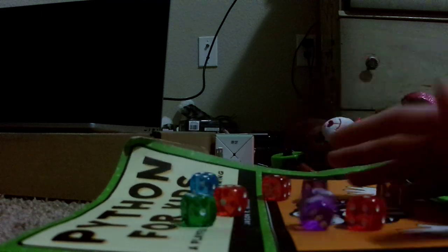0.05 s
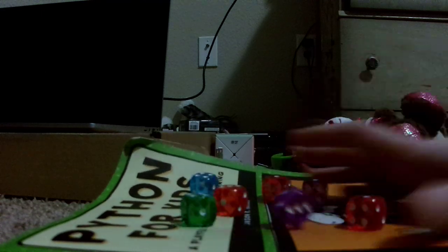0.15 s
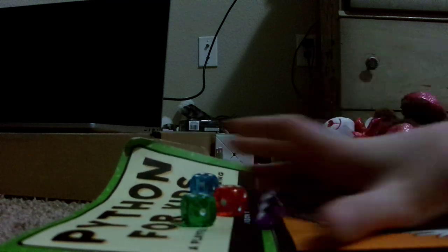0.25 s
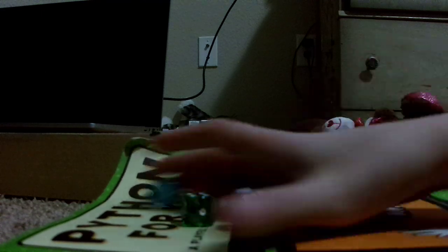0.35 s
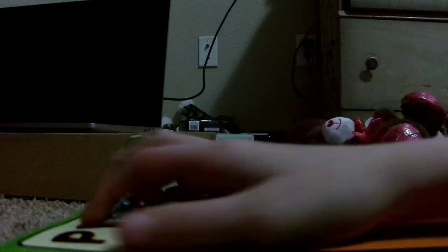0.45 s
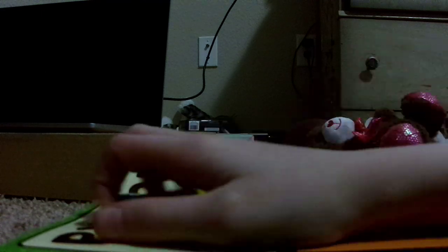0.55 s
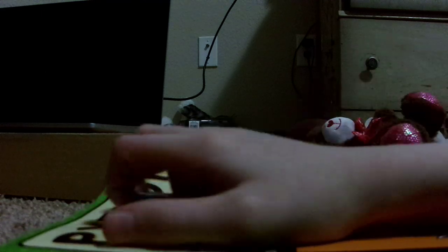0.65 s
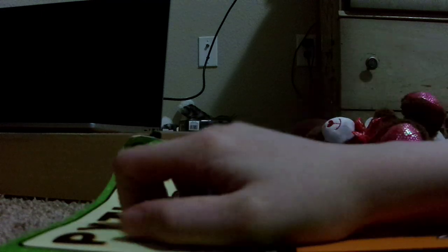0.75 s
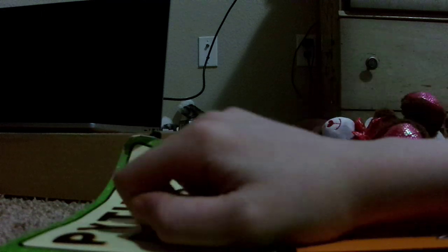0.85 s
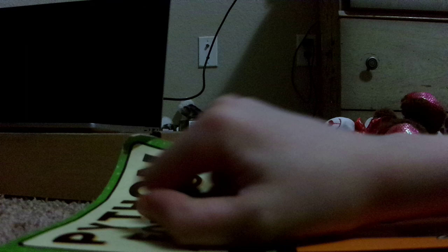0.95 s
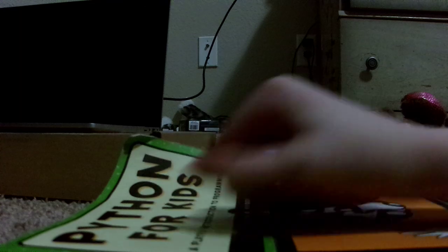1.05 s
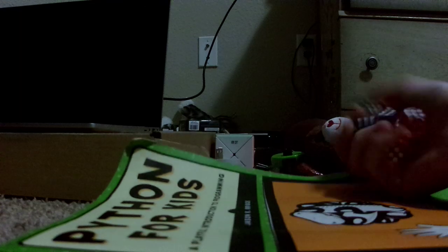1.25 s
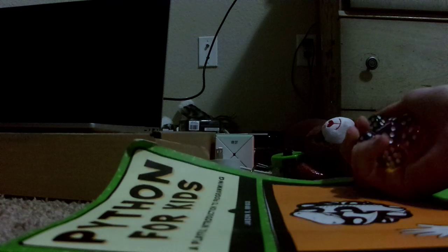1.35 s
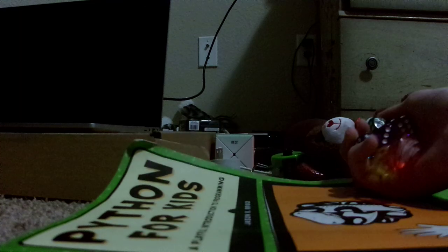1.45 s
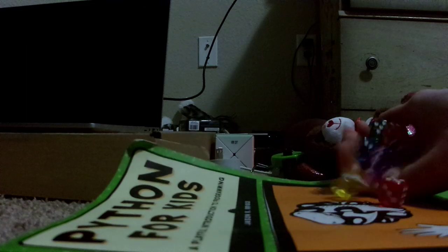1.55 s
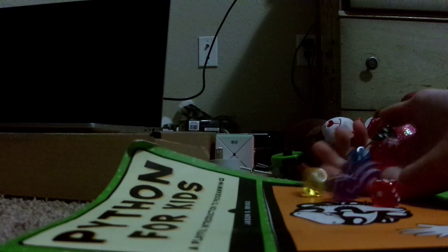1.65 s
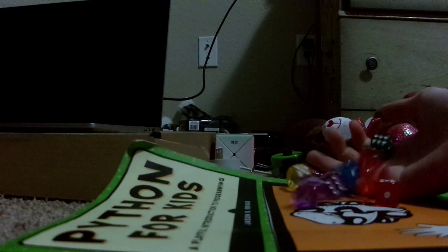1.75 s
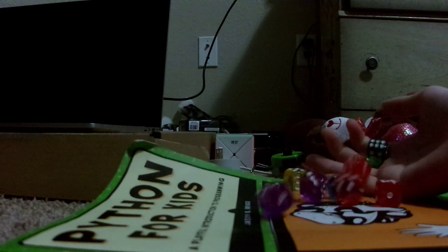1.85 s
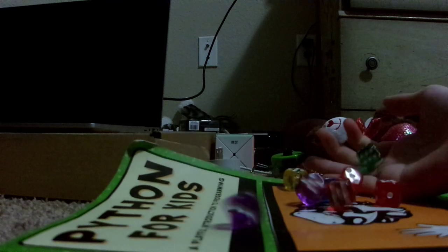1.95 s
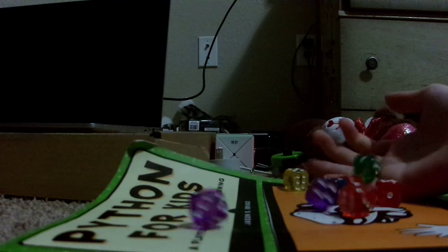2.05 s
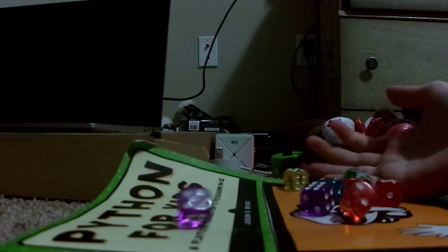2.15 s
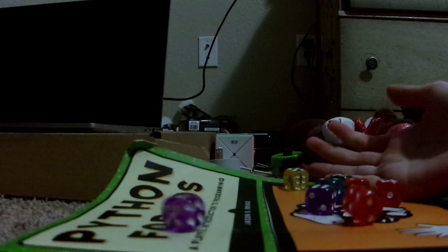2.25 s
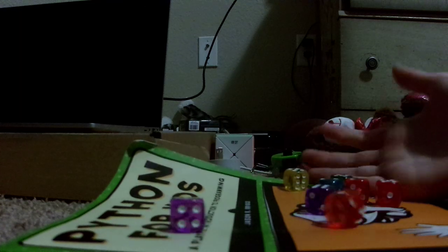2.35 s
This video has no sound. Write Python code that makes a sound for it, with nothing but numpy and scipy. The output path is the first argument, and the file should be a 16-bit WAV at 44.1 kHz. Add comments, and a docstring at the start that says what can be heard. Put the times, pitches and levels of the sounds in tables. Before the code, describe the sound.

Plastic dice clack dry and bright as a hand scoops them off a paperback from 0.2 s, densest and loudest around 0.6-0.7 s, with soft skin brushing and dull book knocks. Nearly quiet from 0.9 s; small muffled, pitched rattles in the hand at 1.24-1.33 s. At 1.5 s they spill onto the cover, thudding, slapping and ticking, a sharp clack at 2.09 s, then fading taps. Small room, faint low hum, close microphone.

```python
"""In a small quiet room with a low hum, plastic dice are scooped off a paperback book and rolled back onto it.
Die against die gives a dry, bright clack: a sharp hit with a short chatter rings three broad resonances.
Die against book gives a tick, a slap of the cover and a hollow thud made of fading tones.
Shaped noise makes the hand's brushing and the grinding dice; the hollow of the hand adds pitched knocks.
The room answers with a fading tail of noise."""
import sys
import numpy as np
from scipy import signal
from scipy.fft import rfft, irfft, next_fast_len
from scipy.io import wavfile
from scipy.ndimage import map_coordinates

SR = 44100
rng = np.random.default_rng(int(sys.argv[2]) if len(sys.argv) > 2 else 0)


def dump(signal):
    """Clip the signal to [-1, 1] and save it as 16-bit WAV at the path in sys.argv[1]."""
    limited = np.clip(np.atleast_2d(signal).T, -1, 1)
    pcm = np.round(limited * 32767).astype(np.int16)
    wavfile.write(sys.argv[1], SR, pcm)


N = 103635

# Time and frequency grids for one short sound
T = np.arange(8192) / SR  # s
HZ = np.fft.rfftfreq(len(T), 1 / SR)

# Room air: [f/Hz, relative level/dB]
AIR_COLOUR = [(28, 2.5), (42, 1), (170, 4), (300, -0.5), (560, -12), (3000, -21), (16000, -27.5)]
AIR_DB = -60.5
# Steady low tones of the room: [f/Hz, middle level/dB]
HUM_TONES = [(27, -55.5), (81.5, -66), (120, -65), (163.5, -61)]
HUM_WAVER_DB = 1.5  # typical size of the random level knots
# Time the room's tail takes to fall by 60 dB: [f/Hz, t/s]
ROOM_T60 = [(300, 0.43), (2000, 0.31), (9000, 0.15), (16000, 0.062)]
ROOM_DELAY_S = 0.004
# Room level for dice in the open hand, dice in a fully closed hand, and the book
OPEN_WET_DB, CUPPED_WET_DB, BOOK_WET_DB = -16.5, -13.5, -15

# How far the hand encloses the dice: [t/s, closed 0-1]
HAND_CLOSED = [(.37, 0.25), (.54, 0.47), (.72, 0.73), (.85, 0.93), (1.3, 0.24), (1.5, 0.01)]
# Skin and sleeve brushing over the cover: [middle t/s, length t/s, level/dB, extra treble/dB]
STROKES = [(0.212, 0.2, -64.5, 11.5), (0.332, 0.31, -58, -1.5), (.55, .38, -55, -2.5),
           (0.956, 0.08, -63.5, 0), (1.058, 0.14, -63, -1), (1.17, 0.034, -58.5, -2)]
# Sound of the brushing: [f/Hz, relative level/dB]
BRUSH_COLOUR = [(150, 7), (350, 19.5), (620, -0.5), (1900, 6), (5000, -1.5), (10500, -1), (16000, -18)]
STROKE_TREBLE_HZ = (3000, 12000)  # extra treble starts, is complete

# Die against book: [t/s, thud level/dB, cover slap level/dB, tick level/dB]
# THUD_DB, SLAP_DB and TICK_DB are added to these levels
KNOCKS = [(0.404, -30, -16, -44), (0.4168, -12.5, -16, -46), (0.4523, -16, -17, -25),
          (0.6093, -12.5, -12, -31), (0.6172, -8, -29, -31), (0.6272, -18.5, -26, -32),
          (0.6993, -16.5, -29, -26), (1.5145, -2, -14, -14.5), (1.523, -9.5, -17.5, -19.5),
          (1.551, -17.5, -32, -30), (1.5648, -18, -22.5, -26.5), (1.603, -16.5, -30, -48),
          (1.6246, -8.5, -15, -38), (1.6649, -22, -27.5, -28.5), (1.6908, -5, -15, -19.5),
          (1.7534, -12, -28, -22), (1.7828, -9, -14, -33), (1.7946, -13, -19, -32),
          (1.799, -16, -19.5, -35), (1.83, -13.5, -19, -28), (1.8656, -16, -28, -38),
          (1.9007, -6.5, -13.5, -27), (1.9533, -12, -16, -25), (1.9618, -14, -22, -31.5),
          (1.9936, -20, -27.5, -37.5), (2.0376, -22, -30.5, -37), (2.058, -22, -27, -36),
          (2.0922, -18.5, -24.5, -26), (2.1622, -16.5, -23, -34), (2.1897, -30, -26.5, -61),
          (2.2009, -20.5, -26, -44), (2.2578, -30, -27.5, -38.5), (2.2698, -22, -27, -48),
          (2.3253, -21, -28.5, -39), (2.3433, -26, -29, -39)]
# Tones of the book: [f/Hz, relative level/dB, time to fall by 60 dB t/s]
BOOK_TONES = [(260.3, -1.5, 0.11), (328.2, 15.5, 0.038), (352.2, -7, 0.26), (394.3, -11, 0.23),
              (739, -2.5, 0.037)]
BOOK_RISE_S, BOOK_BAND_HZ, THUD_DB = 0.0013, (166, 800), 1.5
# Sound of the cover slap: [f/Hz, relative level/dB]
SLAP_COLOUR = [(150, -34), (550, -3.5), (780, 1.5), (980, -3), (1220, 0), (1550, 2), (1880, -3.5),
               (2300, -0.5), (3600, -11), (16000, -28.5)]
SLAP_T60_S, SLAP_DB = 0.015, 0.5  # ring before the hand draws it out; added level
TICK_T60_S, TICK_DB = 0.0034, (-4, -10, 0.5)  # ring; added level in each resonance of the dice

# The hollow of the closed hand rings as the dice shift in it: [t/s, level/dB, pitch f/Hz]
HOLLOWS = [(0.978, -31, 2070), (1.2398, -21.5, 2650), (1.271, -26, 2730), (1.2931, -22.5, 2780),
           (1.3217, -21, 3050)]
HOLLOW_HALF_WIDTH, HOLLOW_T60_S = 0.14, 0.018  # share of the pitch; ring
# Dice grinding past each other in the hand: [t/s, length t/s, level/dB]
GRINDS = [(0.4496, 0.014, -37), (0.5442, 0.0039, -30), (0.621, 0.0071, -41), (0.704, 0.0063, -32.5),
          (1.325, 0.019, -53)]

# Die against die, in each resonance of the dice: [t/s, low level/dB, middle level/dB, high level/dB]
# CLACK_DB is added to these levels
CLACKS = [(0.013, -35, -31, -39), (0.2255, -18, -5, -20), (0.2478, -20, -20, -23),
          (0.2597, -15.5, -14, -21), (0.3591, -13, -0.5, -9), (0.3893, -12, -9, -2.5),
          (0.397, -13.5, -11, -15), (0.4038, -29, -11, -14), (0.432, -25, -26, -16),
          (0.4341, -15, -17, -20), (0.447, -27, -22, -19), (0.481, -24, -17.5, -14),
          (0.5039, -12.5, -22, -12.5), (0.5166, -23, -16, -13), (0.5281, -26, -24, -16),
          (0.5381, -32, -13.5, -11), (0.5416, -6, -14, -5), (0.5978, -10, -23, -21.5),
          (0.605, -20, -15, -25), (0.6091, -1.5, 0, 2.5), (0.6158, -4.5, -6.5, -4),
          (0.628, -6.5, -11, -5.5), (0.6315, -10, -10, -18), (0.6873, -24, -16, -40),
          (0.6924, -18.5, -11.5, -8), (0.6961, -17, -13, -11), (0.6995, -20, -10, -3.5),
          (0.7023, -12, -4.5, 0), (0.721, -29, -17, -56), (0.768, -27, -17, -20.5), (0.7716, -32, -19, -40),
          (0.7904, -25, -10, -22.5), (0.8006, -26, -17, -30), (0.8308, -27.5, -22.5, -29),
          (0.8894, -34, -38, -43), (0.9634, -30.5, -33, -43), (1.24, -31, -22.5, -35),
          (1.2692, -30, -13.5, -21), (1.274, -24, -16, -33), (1.2892, -20, -14.5, -13),
          (1.303, -20.5, -35, -7.5), (1.3086, -24.5, -12, -18), (1.3119, -21.5, -14.5, -21),
          (1.3202, -23, -20, -35), (1.3301, -23.5, -18.5, -34.5), (1.5197, -9.5, -13.5, -7),
          (1.5829, -21, -16.5, -22), (1.5929, -14.5, -18.5, -23), (1.602, -18, -20, -25.5),
          (1.706, -31, -14, -23), (1.7112, -29, -20, -44), (1.72, -34, -19, -41), (1.7339, -25, -14, -12),
          (1.756, -20, -15, -25), (1.7607, -18, -13, -32), (1.8078, -19.5, -30, -28),
          (1.8198, -17.5, -11.5, -16.5), (2.092, -7, -5, -13.5), (2.0942, -41, -16, -12.5),
          (2.1301, -24, -19, -28), (2.1383, -18, -20, -30), (2.143, -17.5, -21, -37),
          (2.1483, -26, -22, -39)]
CLACK_DB = -5
# Centres of the three broad resonances of the dice: [low f/Hz, middle f/Hz, high f/Hz]
DICE_HZ = (3500, 6740, 9400)
# Sound shared by all die hits: [f/Hz, relative level/dB]
DICE_COLOUR = [(150, -12.5), (1000, -9.5), (2600, -1), (4000, 2.5), (5400, -1), (7000, 0), (8300, 0.5),
               (9600, 2), (10600, -1), (11700, -15), (16000, -32.5)]
OPEN_T60_S, CUPPED_T60_S = 0.0043, 0.011  # chatter of a clack in the open and fully closed hand
CHATTER = 0.25  # size against the hit, before the hand changes it
HARDNESS = 0.75  # open hand: dB of top treble per dB by which the high resonance leads the middle
TOP_TREBLE = np.clip((HZ - 10000) / 4000, 0, 1)

TOP_HZ = 16300  # upper limit of the whole sound


def amp(db):
    """Turn decibels into gain."""
    return 10 ** (np.asarray(db) / 20)


def unit(x):
    """Scale a sound to energy 1."""
    return x / np.sqrt(np.sum(x ** 2) + 1e-20)


def along(points, hz):
    """Read (Hz, value) points along a logarithmic axis."""
    f, v = np.transpose(points)
    return np.interp(np.log(hz + 1), np.log(f + 1), v)


def curve(points, s):
    """Read (s, value) points at the times s."""
    return np.interp(s, *np.transpose(points))


def filtered(x, response):
    """Change the strength of each frequency in x by the given response."""
    m = next_fast_len(N + SR // 2)
    spectrum = rfft(x, m) * response(np.fft.rfftfreq(m, 1 / SR))
    return irfft(spectrum, m)[:N]


def noise(colour):
    """Make coloured noise with an average (rms) strength of 1."""
    shaped = filtered(rng.standard_normal(N), lambda hz: amp(along(colour, hz)))
    return unit(shaped) * np.sqrt(N)


def wobble(rate):
    """Draw a smooth random curve with the given number of knots a second."""
    knots = rng.standard_normal(int(N * rate / SR) + 4)
    return map_coordinates(knots, [np.arange(N) * rate / SR])


def add(track, s, sound):
    """Mix a sound into the track at time s."""
    part = track[round(s * SR):][:len(sound)]
    part += sound[:len(part)]


def background():
    """Shaped noise is the room air; low tones that gently waver in level and phase are the hum."""
    t = np.arange(N) / SR
    hum = np.zeros(N)
    for hz, db in HUM_TONES:
        level = amp(db + HUM_WAVER_DB * wobble(1.76)) * np.sqrt(2)
        phase = 2 * np.pi * (hz * t + rng.random()) + 0.5 * wobble(2.0)
        hum += level * np.sin(phase)
    return hum + amp(AIR_DB) * noise(AIR_COLOUR)


def room(x):
    """The room spreads sound into a noise tail in which each frequency dies at its own speed."""
    hz, t, z = signal.stft(rng.standard_normal(SR // 2), SR, nperseg=256)
    fade = amp(-60 * t / along(ROOM_T60, hz)[:, None])
    tail = signal.istft(z * fade, SR, nperseg=256)[1]
    delayed = np.pad(unit(tail), (round(ROOM_DELAY_S * SR), 0))
    return signal.fftconvolve(x, delayed)[:N]


def contact(t60, chatter):
    """A hit pushes once, sharply, then chatters with quickly dying random force."""
    force = chatter * rng.standard_normal(len(T)) * amp(-60 * T / t60)
    force[0] = -1
    return force


def body(force, gain_db):
    """A struck body answers only after the force arrives, with the given gain at each frequency."""
    # Folding the cepstrum to its early half gives a filter with no sound before the hit
    cepstrum = irfft(np.log(amp(gain_db)), len(T))
    cepstrum[1:len(T) // 2] *= 2
    cepstrum[len(T) // 2:] = 0
    return irfft(rfft(force) * np.exp(rfft(cepstrum)), len(T))


def die(force, levels_db):
    """A die rings in three broad resonances; their balance depends on how it is struck."""
    hz = HZ * np.exp(0.03 * rng.standard_normal())  # slightly different pitch each time
    colour = along(DICE_COLOUR, hz) + np.interp(hz, DICE_HZ, levels_db)
    return np.linalg.norm(amp(levels_db)) * unit(body(force, colour))


def brush(grain_db=2, touches_per_s=600, touch_db=5):
    """Each hand stroke over the book is a swell of uneven hiss; the closing hand jostles the dice."""
    t = np.arange(N) / SR
    hiss, level = np.zeros(N), np.zeros(N)
    for s, length, db, treble_db in STROKES:
        swell = amp(db) * np.exp(-np.abs(2 * (t - s) / length) ** 3)
        hiss += swell * filtered(
            noise(BRUSH_COLOUR), lambda hz: amp(np.interp(hz, STROKE_TREBLE_HZ, (0, treble_db))))
        level += swell
    effort = np.clip(level / level.max() * curve(HAND_CLOSED, t), 0, 1)
    # Touches come more often, and harder, with more effort
    happens = rng.random(N) < effort * touches_per_s / SR
    touches = happens * rng.standard_normal(N) * np.sqrt(SR / touches_per_s)
    touch_sound = die(contact(OPEN_T60_S, CHATTER), np.zeros(len(DICE_HZ)))
    jostle = signal.fftconvolve(touches * effort, touch_sound)[:N]
    return hiss * amp(grain_db * wobble(110)) + amp(touch_db) * level * jostle


def knocks(scatter_db=2.2, detune=0.046, slap_chatter=0.12, tick_chatter=0.44):
    """A landing die ticks, the cover slaps and the book thuds in several fading tones."""
    out = np.zeros(N)
    pages = signal.butter(2, BOOK_BAND_HZ, "bandpass", fs=SR, output="sos")
    shortest = min(t60 for hz, db, t60 in BOOK_TONES)
    for s, thud_db, slap_db, tick_db in KNOCKS:
        tones = np.zeros(len(T))
        for hz, db, t60 in BOOK_TONES:
            level = amp(db + scatter_db * rng.normal() - 60 * T / t60)
            # Short tones shift more with the landing spot than long ones
            pitch = hz * (1 + detune * shortest / t60 * rng.normal())
            tones += level * np.sin(2 * np.pi * pitch * T)
        thud = unit(signal.sosfilt(pages, tones * (1 - np.exp(-T / BOOK_RISE_S))))
        # A die under the hand scrapes on instead of bouncing
        drag = 1 + 2 * np.clip(curve(HAND_CLOSED, s), 0, 1)
        slap_force = contact(SLAP_T60_S * drag, slap_chatter * drag)
        slap = unit(body(slap_force, along(SLAP_COLOUR, HZ)))
        tick = die(contact(TICK_T60_S, tick_chatter), TICK_DB)
        add(out, s, amp(thud_db + THUD_DB) * thud + amp(slap_db + SLAP_DB) * slap + amp(tick_db) * tick)
    return out


def hollows(chatter=0.14):
    """Air between the fingers gives a short pitched knock; its pitch follows their grip."""
    out = np.zeros(N)
    for s, db, hz in HOLLOWS:
        band = (hz * (1 - HOLLOW_HALF_WIDTH), hz * (1 + HOLLOW_HALF_WIDTH))
        cavity = signal.butter(2, band, "bandpass", fs=SR, output="sos")
        knock = signal.sosfilt(cavity, contact(HOLLOW_T60_S, chatter))
        add(out, s, amp(db) * unit(knock))
    return out


def grinds(low_db=-4, middle_db=-4, spiky=0.93, edge_db=18):
    """Edges slip over faces in a dense run of tiny contacts, brightest while the hand is open."""
    out = np.zeros(N)
    for s, length, db in GRINDS:
        grains = rng.standard_normal(len(T)) * np.exp(spiky * rng.standard_normal(len(T)))
        force = grains * np.exp(-(T / length) ** 4)
        force = body(force, edge_db * (1 - curve(HAND_CLOSED, s)) ** 2 * TOP_TREBLE)
        grind = unit(die(force, (low_db, middle_db, 0)))
        add(out, s, amp(db) * np.sqrt(length * SR) * grind)
    return out


def clacks():
    """Dice ring as they collide: hard corner hits are brightest, a closed hand dulls and lengthens."""
    out = np.zeros(N)
    for s, low_db, middle_db, high_db in CLACKS:
        closed = np.clip(curve(HAND_CLOSED, s), 0, 1)
        t60 = OPEN_T60_S + (CUPPED_T60_S - OPEN_T60_S) * closed
        force = contact(t60, CHATTER * (0.5 + 2 * closed))
        treble_db = HARDNESS * (1 - closed) * np.clip(high_db - middle_db, 0, 20)
        force = body(force, treble_db * TOP_TREBLE)
        add(out, s, amp(CLACK_DB) * die(force, (low_db, middle_db, high_db)))
    return out


def scene():
    """Mix all sources; dice in the closed hand are heard more by way of the room."""
    dice = clacks() + grinds() + hollows()
    book = knocks()
    closed = curve(HAND_CLOSED, np.arange(N) / SR)
    wet_db = OPEN_WET_DB + (CUPPED_WET_DB - OPEN_WET_DB) * closed
    echo = room(amp(wet_db) * dice + amp(BOOK_WET_DB) * book)
    return (dice + book + echo + brush() + background())[None]


def record(dry):
    """Cut the sound off very steeply above its upper frequency limit."""
    return filtered(dry[0], lambda hz: 1 / np.sqrt(1 + (hz / TOP_HZ) ** 160))[None]


dry = scene()
out = record(dry)
dump(out)
```